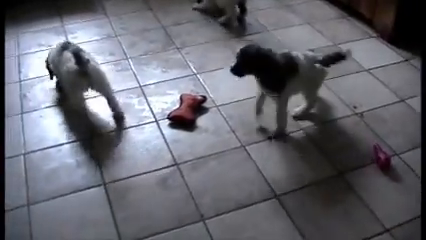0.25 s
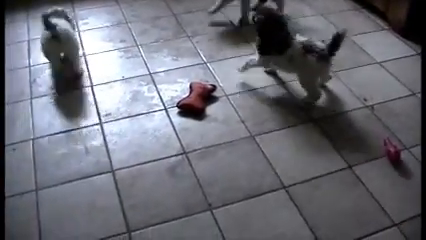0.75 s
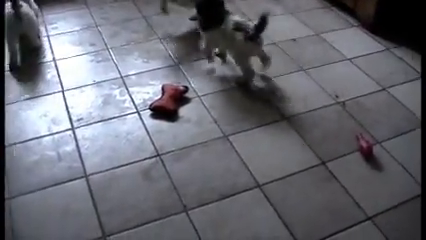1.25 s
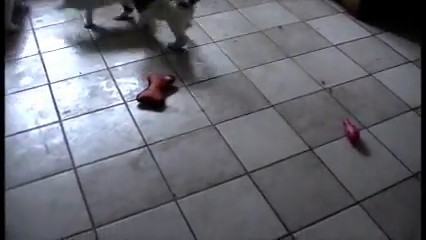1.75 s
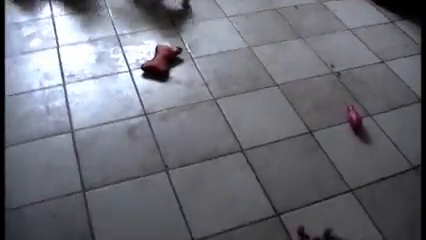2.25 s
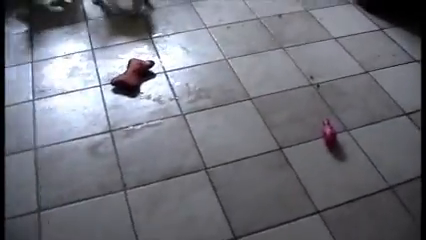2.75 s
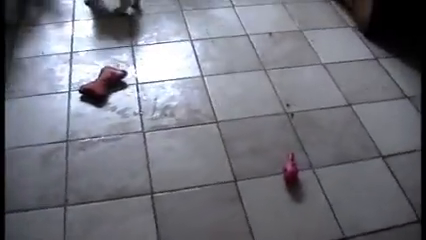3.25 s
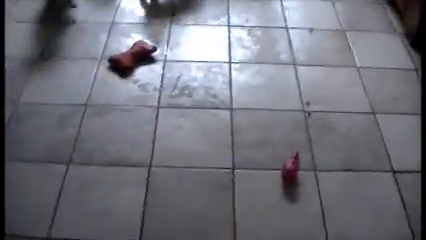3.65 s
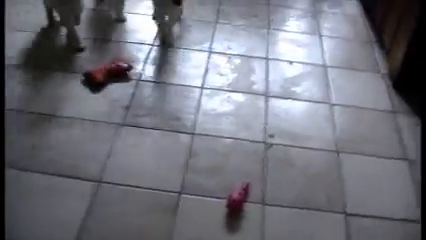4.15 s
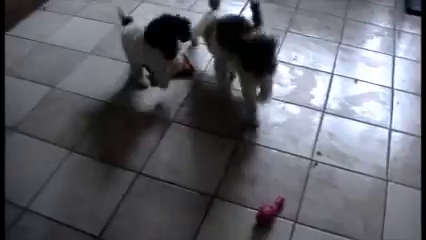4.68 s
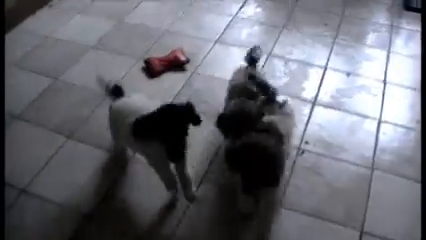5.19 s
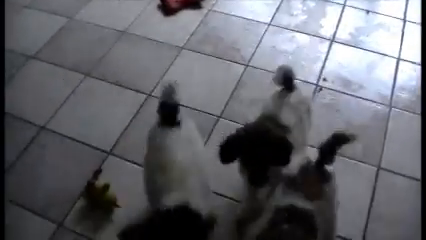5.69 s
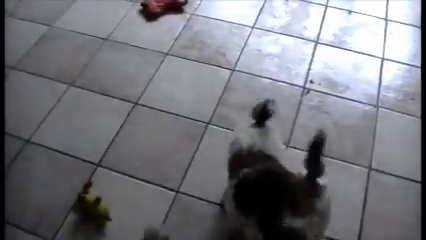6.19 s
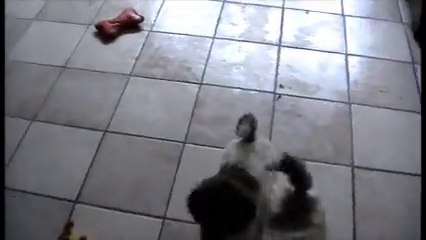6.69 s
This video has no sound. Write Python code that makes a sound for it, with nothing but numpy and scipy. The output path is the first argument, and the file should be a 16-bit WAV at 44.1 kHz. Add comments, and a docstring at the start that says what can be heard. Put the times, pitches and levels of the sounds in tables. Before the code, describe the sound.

After a puppy's falling yelp and short yap, close lip smacks call the litter, and soft paws trot across kitchen tiles.

```python
"""Puppies on a tiled kitchen floor: one yelps and yaps, its vocal folds driving throat resonances, while thin
tones whistle through its nose. Paws thud, claws tick and fur scuffs as the litter trots up. Close by, air
sucked through tight lips makes quick kissing smacks, and hands rumble on the microphone. Hard walls give the
puppies and smacks a short bright reverberation over a soft room hum."""
import sys
import numpy as np
from scipy import signal
from scipy.fft import rfft, irfft
from scipy.io import wavfile
from scipy.ndimage import uniform_filter1d

SR = 44100
rng = np.random.default_rng(int(sys.argv[2]) if len(sys.argv) > 2 else 0)


def waveform_to_disk(signal):
    """Save audio, clipped to [-1, 1], as 16-bit WAV at the path in sys.argv[1]."""
    frames = np.transpose(np.atleast_2d(signal))
    scaled = np.clip(frames, -1, 1) * 32767
    samples = np.round(scaled).astype(np.int16)
    wavfile.write(sys.argv[1], SR, samples)


N = 305568
TIME = np.arange(N) / SR
# stereo width: (frequency [Hz], gain of the side signal [dB])
STEREO_WIDTH = [(60, -22), (200, -32.5), (500, -10.5), (900, -10.5), (2200, -9.5), (3200, -65), (7000, -58),
                (12000, -33)]


def undb(db):
    """Amplitude ratio of a level in decibels."""
    return 10 ** (np.asarray(db) / 20)


def unit(x):
    """Normalisation to an RMS of 1."""
    return x / np.sqrt(np.mean(x ** 2))


def band(x, hz, width):
    """Two-pole resonance with unit gain at its centre."""
    return signal.lfilter(*signal.iirpeak(min(hz, .45 * SR), hz / width, SR), x)


def modes(x, table):
    """Superposition of resonances: (frequency [Hz], bandwidth [Hz], gain [dB])."""
    return sum(undb(db) * band(x, hz, width) for hz, width, db in table)


def shape(x, table):
    """Spectral weighting by a curve: (frequency [Hz], gain [dB])."""
    hz, db = np.transpose(table)
    f = np.arange(x.shape[-1] // 2 + 1) * SR / x.shape[-1] + 1
    return irfft(rfft(x) * undb(np.interp(np.log(f), np.log(hz), db)), x.shape[-1])


def walk(rate, size=N):
    """Random fluctuation smoothed over 1 / rate seconds; mean 0, RMS 1."""
    span = max(int(SR / rate), 1)
    x = uniform_filter1d(uniform_filter1d(rng.standard_normal(size), span), span)
    return unit(x - x.mean())


def add(out, start, x):
    """Superposition of x on out from a start time in seconds."""
    i = int(start * SR)
    out[i:i + len(x)] += x[:N - i]


def contours(table, fade_s):
    """Linear interpolation of a call: an edge fade, then each column after time, per sample."""
    times, *columns = np.transpose(table)
    t = np.arange(times[0], times[-1], 1 / SR)
    since_onset = t - times[0] + (times[0] == 0)  # a call at time 0 is already sounding
    fade = np.clip(np.minimum(since_onset, times[-1] - t) / fade_s, 0, 1)
    return [fade] + [np.interp(t, times, column) for column in columns]


def grains(rate, scatter_db):
    """Poisson impulses, rate per second, of random sign and widely scattered strength."""
    occurs, sign, strength = rng.random((3, N))
    return (occurs < rate / SR) * np.sign(sign - .5) * undb(-scatter_db * np.log(strength + .03))


def swells(centres, lengths, levels):
    """Sum of Gaussian envelopes."""
    return sum(undb(db) * np.exp(-8 * ((TIME - centre) / length) ** 2)
               for centre, length, db in zip(centres, lengths, levels))


def nose_whistles():
    """Flow-driven oscillation in the nose: a thin gliding tone and its octave."""
    # (time [s], duration [s], first [Hz], middle [Hz], last pitch [Hz], level [dB], peak position [0-1])
    whistles = [(0.0, 0.066, 6115, 6000, 6160, -14.5, 0.01), (0.33, .29, 6920, 7100, 5900, -38, 0.4),
                (1.029, 0.096, 6510, 6890, 7100, -31, 0.37), (1.153, .17, 5890, 5960, 6270, -27.5, 0.62),
                (1.311, 0.14, 7800, 6970, 7050, -33, 0.18)]
    rise_db, fall_db = 2, 68
    out = np.zeros(N)
    for start, length, first, middle, last, peak_db, peak_at in whistles:
        envelope = [(start, peak_db - rise_db), (start + peak_at * length, peak_db),
                    (start + length, peak_db - fall_db)]
        fade, db = contours(envelope, fade_s=0.017)
        u = np.linspace(-1, 1, len(db))
        hz = middle + (last - first) / 2 * u + ((first + last) / 2 - middle) * u ** 2
        phase = 2 * np.pi * np.cumsum(hz * (1 + 0.0078 * walk(270, len(hz)))) / SR
        add(out, start, fade * undb(db) * (np.sin(phase) + undb(-4.5) * np.sin(2 * phase)))
    return out


def trotting(activity):
    """Shot noise: many small pad falls excite a low boom in the floor."""
    boom = band(band(grains(300, scatter_db=0.61), 100, 325), 250, 500)
    return unit(boom) * activity * undb(2 * walk(4.7))


def scuffing(activity):
    """Friction noise: claws scrape and fur brushes the tile in many tiny contacts."""
    # sliding paws: (centre time [s], duration [s], claw level [dB], fur level [dB])
    slides = [(0.0, 0.68, -37, -50), (1.738, 0.37, -40.5, -43.5), (2.2, 0.52, -35.5, -45),
              (2.418, 0.071, -30, -46), (2.98, 0.43, -45, -52), (3.473, 0.27, -34, -34.5),
              (4.26, 0.16, -33.5, -48), (4.43, 0.15, -37.5, -44), (5.176, 0.46, -43, -41),
              (5.45, 0.48, -47.5, -49.5), (5.888, 0.2, -43.5, -34), (6.14, 0.18, -61, -46.5),
              (6.478, 0.076, -46.5, -74), (6.9, 0.36, -70, -53.5)]
    centres, lengths, claw_db, fur_db = np.transpose(slides)
    scrape = band(grains(1300, scatter_db=0.45), 1570, 1450)
    brush = band(band(grains(2200, scatter_db=9.1), 5570, 4400), 7100, 7500)
    claw_gain = activity * undb(-0.5) + swells(centres, lengths, claw_db)
    fur_gain = activity * undb(-5.5) + swells(centres, lengths, fur_db)
    return unit(scrape) * claw_gain + unit(brush) * fur_gain


def room_hum():
    """Ambient noise as mid and side: a coloured spectrum whose level drifts slowly."""
    # (frequency [Hz], relative spectral density [dB])
    spectrum = [(15, -8), (25, 5), (190, -27.5), (394, 6), (1780, 3.5), (2020, -16), (2430, 3.5),
                (3320, -2.5), (8910, -15), (10400, -18), (12500, -104), (16200, -93), (22000, -120)]
    noise = unit(shape(rng.standard_normal((2, N)), spectrum))
    mid, side = noise * undb(-55 + 3.7 * walk(1))
    return mid, shape(side, STEREO_WIDTH)


def hand_rumble():
    """Structure-borne noise: hands shifting on the microphone rumble in fits."""
    # (centre time [s], duration [s], level [dB])
    shifts = [(0.297, 0.23, -51), (.54, .3, -53), (0.967, 0.35, -57.5), (1.701, .2, -51),
              (2.157, 0.38, -49), (2.667, 0.19, -49.5), (2.978, .2, -59.5), (4.7, .5, -53),
              (5.21, 0.14, -47), (5.44, 0.57, -55), (5.9, 0.31, -54), (6.504, 0.57, -64)]
    still_db = -72
    rumble = band(band(rng.standard_normal(N), 67, 34), 54, 64)
    return unit(rumble) * (undb(still_db) + swells(*np.transpose(shifts)))


def voice(call):
    """Source and filter: vocal-fold harmonics and breath pass through the throat and muzzle."""
    # formants: (frequency [Hz], bandwidth [Hz], gain [dB])
    throat = [(497, 310, -22), (1287, 303, 7), (2370, 470, -7), (3920, 5100, -4.5), (6300, 730, 8),
              (11800, 530, 3)]
    # treble loss: (frequency [Hz], gain [dB])
    muzzle = [(4000, 0), (5000, -17), (12000, -19)]
    fade, hz, db, tilt, roughness = contours(call, fade_s=0.0013)
    size = len(hz)
    jitter = 0.412 * roughness ** 2 * walk(496, size) + .014 * walk(155, size)
    hz = hz * np.exp(jitter)
    phase = 2 * np.pi * np.cumsum(hz) / SR
    folds = sum((k * hz < .4 * SR) * undb(tilt * np.log2(k)) * np.sin(k * phase) for k in range(1, 15))
    breath = undb(-11.5) * (.5 + roughness) * band(rng.standard_normal(size), 4800, 7800)
    shimmer = 1 + roughness * walk(266, size)
    tone = shape(modes(folds * shimmer + breath, throat), muzzle)
    running_rms = np.sqrt(uniform_filter1d(tone ** 2, SR // 40))
    return fade * undb(db) * tone / running_rms


def yelp_and_yap():
    """Phonation: the vocal folds give a falling yelp, then a short yap."""
    # both: (time [s], pitch [Hz], level [dB], source tilt [dB/octave], roughness [0-1])
    yelp = [(.358, 1715, -26.5, 1, 0.04), (.385, 1840, -15.5, -3, 0.09), (.46, 1860, -20, -0.5, 0),
            (.495, 1668, -16, -6, 0.11), (.59, 1417, -8.5, -7.5, 0), (.64, 1420, -18, -3, 0.16),
            (.68, 1389, -5.5, -19, 0.06), (.70, 1125, -16.5, -3, 0.35), (.765, 732.8, -19, -10, 0.22),
            (.82, 736, -20, -5, 0.28), (.85, 728.6, -14.5, -11.5, 0.79), (.89, 743, -21, -15, 0.31)]
    yap = [(1.041, 819, -30.5, -1, 0.24), (1.055, 848, -16, -8, 0.33), (1.10, 904.5, -17, -6, 0.18),
           (1.147, 861.5, -9.5, -51, 0.093), (1.17, 886, -31, -31, 0.13), (1.2, 917, -45, -27, .1)]
    out = np.zeros(N)
    for call in (yelp, yap):
        add(out, call[0][0], voice(call))
    return out


def paw_thuds():
    """Damped oscillation: a padded paw pushes the floor into a few uneven low cycles."""
    # (time [s], level [dB], frequency [Hz])
    footfalls = [(0.466, -33, 295), (0.499, -29, 165), (0.84, -31, 208), (1.603, -32.5, 208),
                 (1.626, -28, 170), (1.663, -26, 221), (2.009, -22, 194), (2.139, -25.5, 182),
                 (4.611, -28.5, 297), (4.798, -34, 179), (5.095, -33, 139), (5.184, -33.5, 190),
                 (5.318, -27, 125), (5.54, -32, 216), (5.751, -42, 283), (5.846, -27, 232.5),
                 (6.286, -43, 197), (6.32, -40, 154), (6.404, -33.5, 234), (6.58, -40, 288)]
    attack_s, decay_s = 0.0039, 0.015
    out, t = np.zeros(N), TIME[:SR // 8]
    envelope = (1 - np.exp(-t / attack_s)) * np.exp(-t / decay_s)
    for start, db, hz in footfalls:
        shake = 1 + 0.97 * walk(450, len(t))
        add(out, start, undb(db) * shake * np.sin(2 * np.pi * hz * t) * envelope)
    return out


def tile_knocks():
    """Impact excitation: a claw or toy strikes and slips, ringing the tile with a knock and a tick."""
    # (time [s], level [dB], tick relative to knock [dB], knock frequency [Hz])
    impacts = [(1.667, -39.5, -3, 1690), (4.607, -22.5, -27, 450), (4.799, -30, -45, 503),
               (5.229, -48, 5, 1500), (5.133, -51, 8, 538), (5.18, -40, -1, 678), (5.547, -26, -27, 1900),
               (5.859, -36.5, 0, 527), (5.997, -36.5, -28, 540), (6.326, -36.5, -4.5, 576),
               (6.41, -37, -29, 1530), (6.585, -31, -40, 1500), (6.816, -44.5, -4, 525)]
    # (frequency [Hz], bandwidth [Hz], gain [dB])
    tile_modes = [(515, 350, 19.5), (1530, 460, 2.5)]
    out, t = np.zeros(N), TIME[:SR // 20]
    for start, db, tick_db, hz in impacts:
        slips = 0.35 * rng.standard_normal(len(t)) * np.exp(-t / 0.0034)
        contact = (t == 0) + slips
        knock = band(contact, hz, hz) + modes(contact, tile_modes)
        tick = band(contact, 2300, 7000)
        add(out, start, undb(db) * (knock / knock.max() + undb(tick_db) * tick / tick.max()))
    return out


def kissing_smacks():
    """Cavity resonance: puffs sucked through tight lips ring the mouth and slow as the lips part."""
    # (time [s], level [dB], mouth [Hz], relative hiss [dB], duration [s], growth [dB], relative click [dB])
    smacks = [(1.765, -15.5, 806, -10, 0.011, -6, -12), (1.779, -17, 756, -16, 0.0052, 3, -20),
              (1.964, -12, 998, -11, .022, 2.5, -4), (2.174, -25.5, 950, -2, 0.0092, -37, -2),
              (2.179, -18, 1097, -6, 0.022, -7, -20), (2.393, -15.5, 780, -8.5, 0.0054, -1, -2),
              (2.4, -17, 1070, -6.5, 0.017, 6, -20), (3.114, -13, 826, -12, 0.016, -1, -16),
              (3.331, -12.5, 1008, -12, 0.022, -7.5, -12), (3.548, -14, 1059, -11, .026, -3, -8),
              (3.771, -12.5, 1034, -13.5, 0.021, -3.5, -14), (3.991, -16.5, 1153, -10.5, .022, 2, 2),
              (4.213, -15.5, 1173, -7.5, 0.017, 4, -6), (4.451, -21.5, 989, -4.5, .016, 8, -5)]
    # two for the buzz, then three for the hiss: (frequency [Hz], bandwidth [Hz], gain [dB])
    lip_modes = [(441, 350, 21), (2160, 7400, -98), (3500, 2240, -6), (7000, 1900, -11.5), (9700, 520, -17)]
    slowing_oct_per_s, hiss_peak_at = 48.1, 0.55
    out = np.zeros(N)
    for start, db, hz, hiss_db, length, growth_db, click_db in smacks:
        u = np.linspace(0, 1, int(length * SR))
        size = len(u)
        puff_hz = hz * 2 ** (-slowing_oct_per_s * length * u ** 3.57) * np.exp(.14 * walk(760, size))
        phase = 2 * np.pi * np.cumsum(puff_hz) / SR
        puffs = sum(np.cos(k * phase) / k ** 1.16 for k in range(1, 5))
        buzz = modes(puffs, [(hz, 900, 0)] + lip_modes[:2]) * undb(growth_db * u + 2 * walk(380, size))
        hiss = unit(modes(rng.standard_normal(size), lip_modes[2:]))
        hiss *= .5 + np.exp(-((u - hiss_peak_at) / 0.078) ** 2)
        hiss *= 1 + 0.18 * np.cos(phase)  # pulses with the puffs
        fade = np.clip(np.minimum(u / .14, (1 - u) / 0.1), 0, 1)
        add(out, start, undb(db) * fade * (unit(buzz) / 2 + undb(hiss_db) * hiss))
        click = modes(signal.unit_impulse(size), [(hz, 1200, 0), (4000, 5000, -8)])
        add(out, start, undb(db + click_db) * click / click.max())
    return out


def lip_ticks():
    """Impulse response: wet lips unstick with tiny ringing ticks."""
    # (time [s], level [dB])
    ticks = [(2.9636, -24), (2.9657, -18), (2.968, -28)]
    # (frequency [Hz], bandwidth [Hz], gain [dB])
    tick_modes = [(3300, 1100, 0), (900, 280, -26), (8900, 560, -18)]
    out = np.zeros(N)
    ring = modes(signal.unit_impulse(SR // 50), tick_modes)
    for start, db in ticks:
        add(out, start, undb(db) * ring / ring.max())
    return out


def kitchen_reverb(x):
    """Reverberation as mid and side: convolution with noise that decays exponentially in each band."""
    # (frequency [Hz], reverberation time [s], relative level [dB])
    decay = [(106, 0.77, -2.5), (490, 0.3, -3), (1500, 0.53, 5), (4170, 0.77, 0.5), (9000, 0.31, 8)]
    hz, t60, db = np.transpose(decay)
    t, tail = TIME[:SR], 0
    for centre in 50 * 2 ** np.arange(0, 8, .5):
        band_t60, band_db = (np.interp(np.log(centre), np.log(hz), column) for column in (t60, db))
        noise = band(rng.standard_normal((2, SR)), centre, centre / 2)
        tail = tail + noise * undb(band_db - 60 * t / band_t60)
    build_up = np.clip(t / 0.0097, 0, 1)
    tail *= build_up / np.sqrt(np.sum(tail[0] ** 2))
    mid, side = signal.fftconvolve(x[None], tail, axes=1)[:, :N]
    return mid, shape(side, STEREO_WIDTH)


def scene():
    """Superposition of direct sound, reverberation and background, each source at its own mix gain."""
    # how busy and near the litter is: (time [s], level [dB])
    bustle = [(0.0, -58.5), (0.48, -50), (0.63, -73), (0.87, -49), (1.5, -54.5), (1.75, -54), (2.12, -49.5),
              (2.3, -56), (2.55, -44.5), (2.72, -59.5), (3.3, -56), (4.4, -55.5), (4.65, -42), (5.1, -51),
              (5.4, -47), (5.8, -47), (6.3, -57), (6.93, -52.5)]
    activity = undb(np.interp(TIME, *np.transpose(bustle)))
    puppies = yelp_and_yap() + nose_whistles()
    lips = kissing_smacks() + lip_ticks()
    knocks, scuffs = tile_knocks(), scuffing(activity)
    pads = trotting(activity) + paw_thuds()
    direct = undb(-7) * puppies + lips + undb(4.5) * knocks + pads + undb(-12) * scuffs
    to_walls = undb(-5) * puppies + undb(-6.5) * lips + undb(9.5) * knocks + pads + undb(-10.5) * scuffs
    room_mid, room_side = kitchen_reverb(to_walls)
    hum_mid, hum_side = room_hum()
    placement = shape(lips - puppies, STEREO_WIDTH) * undb(-14)  # lips a little left, puppies right
    mid = direct + room_mid + hum_mid + hand_rumble()
    side = room_side + hum_side + placement
    return np.array([mid + side, mid - side])


def record(dry):
    """Band limiting: the microphone thins the deepest bass and cuts the top treble."""
    low_hz, top_hz = 39.5, 11950
    thinned = signal.sosfilt(signal.butter(2, low_hz, "high", fs=SR, output="sos"), dry)
    return signal.sosfilt(signal.ellip(10, .2, 70, top_hz, fs=SR, output="sos"), thinned)


dry = scene()
out = record(dry)
waveform_to_disk(out)
```